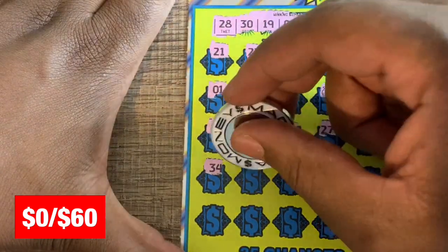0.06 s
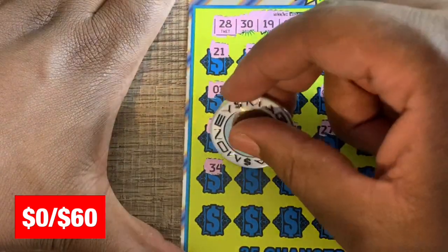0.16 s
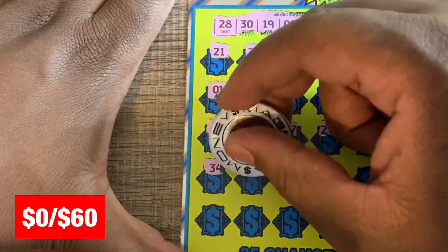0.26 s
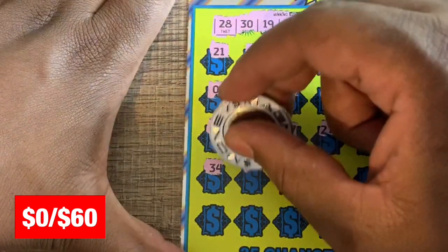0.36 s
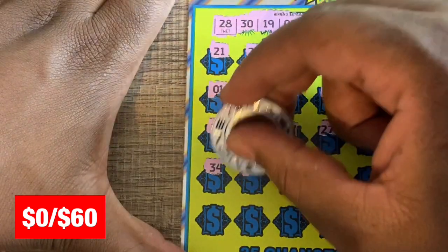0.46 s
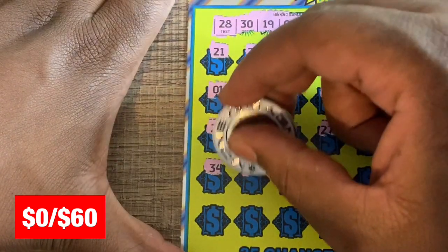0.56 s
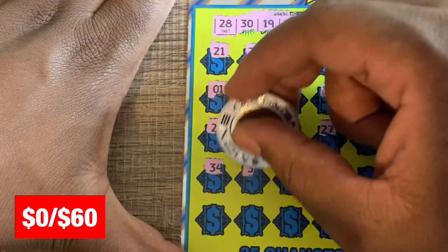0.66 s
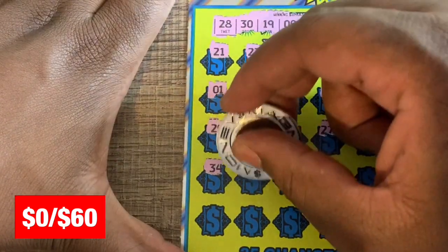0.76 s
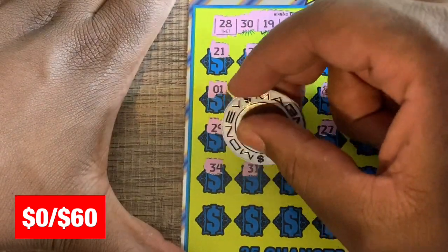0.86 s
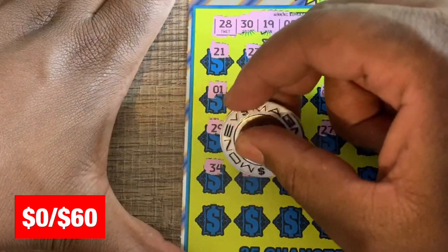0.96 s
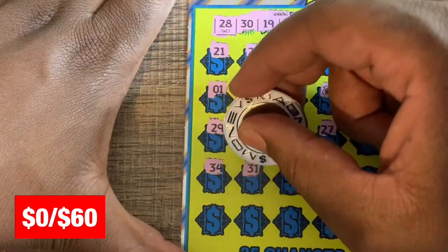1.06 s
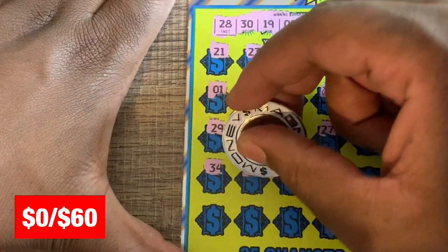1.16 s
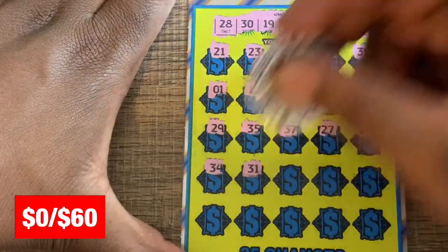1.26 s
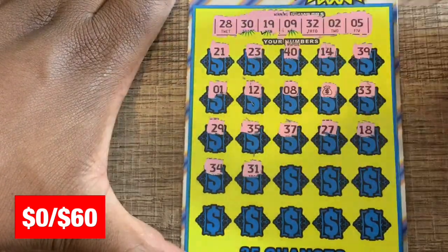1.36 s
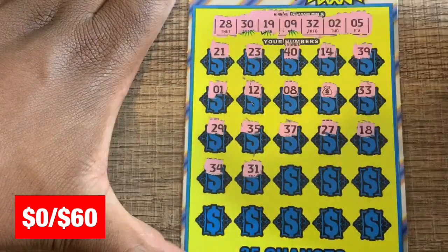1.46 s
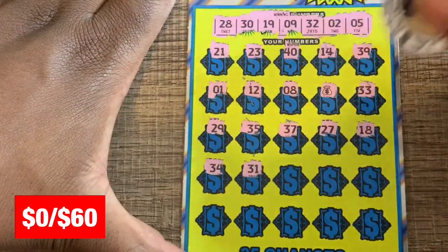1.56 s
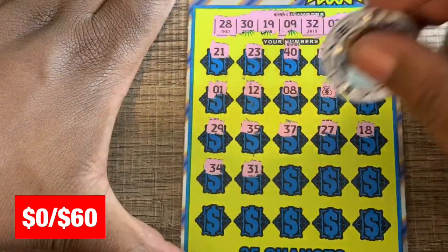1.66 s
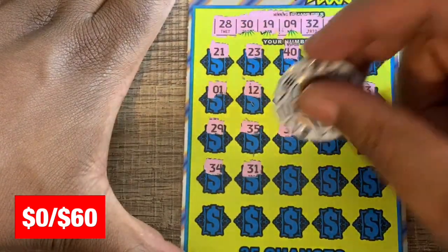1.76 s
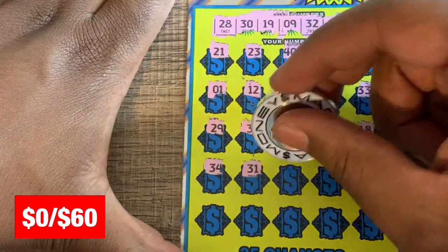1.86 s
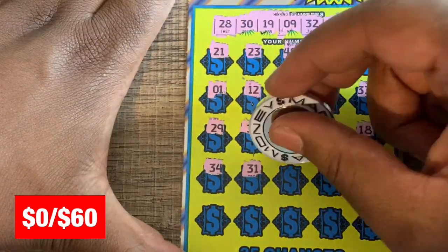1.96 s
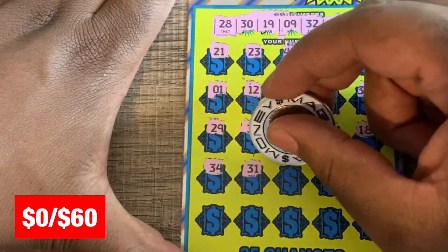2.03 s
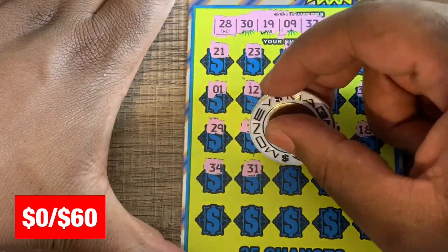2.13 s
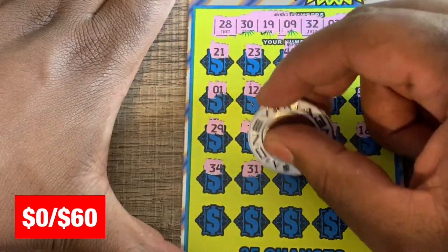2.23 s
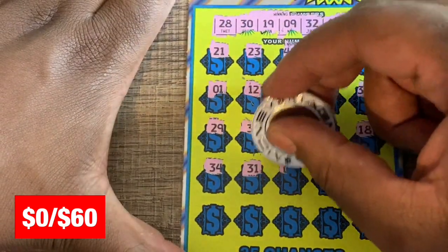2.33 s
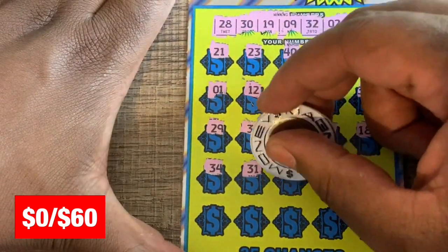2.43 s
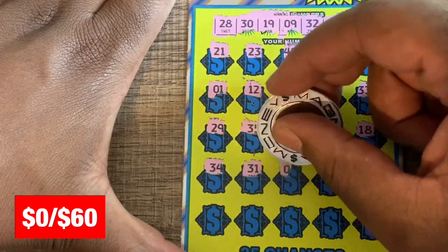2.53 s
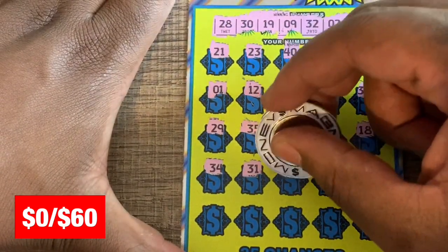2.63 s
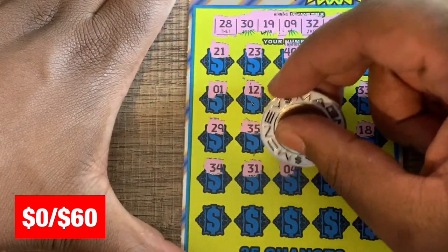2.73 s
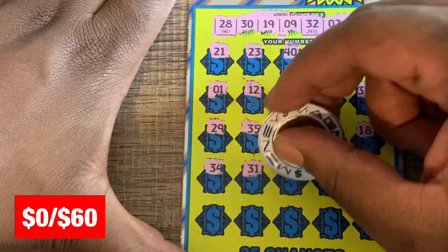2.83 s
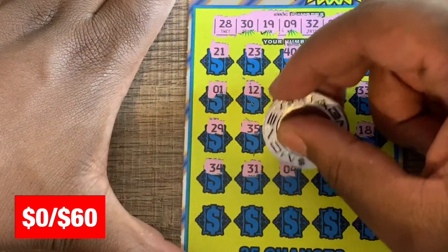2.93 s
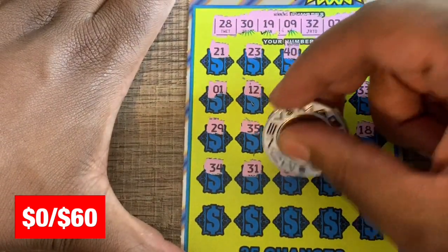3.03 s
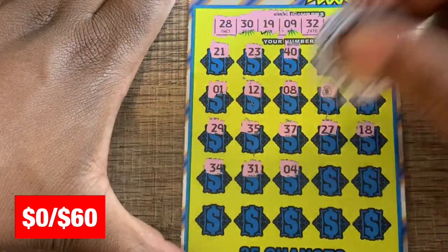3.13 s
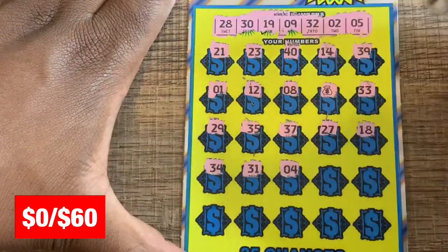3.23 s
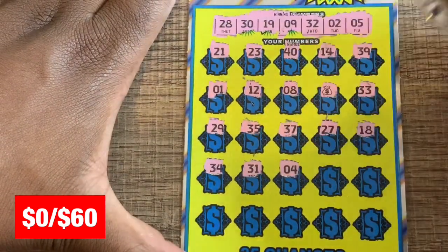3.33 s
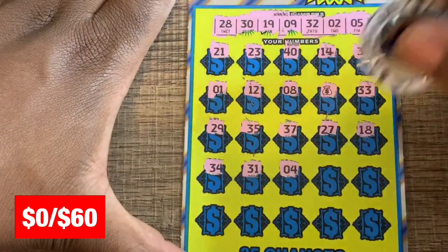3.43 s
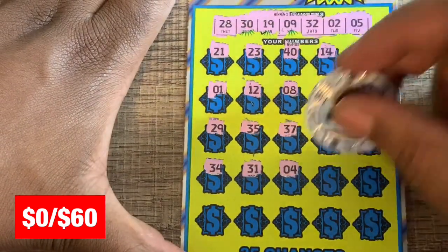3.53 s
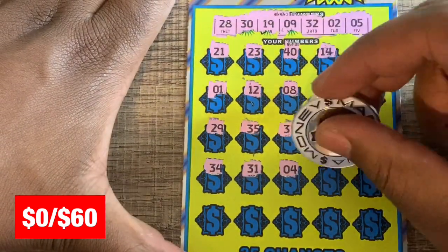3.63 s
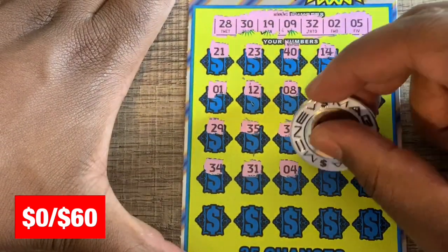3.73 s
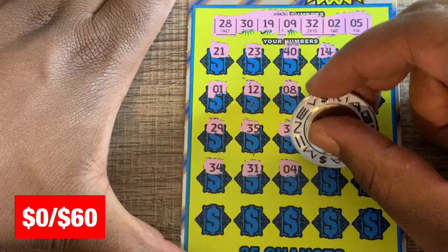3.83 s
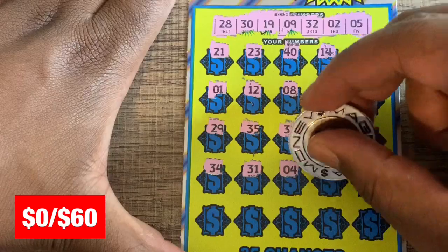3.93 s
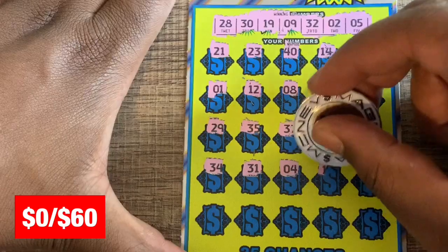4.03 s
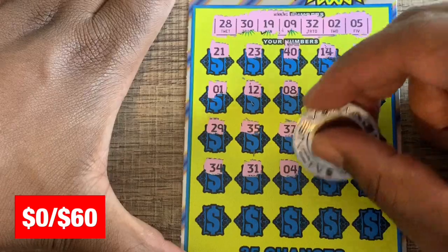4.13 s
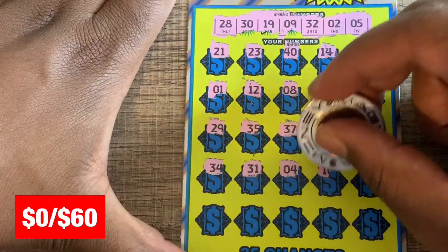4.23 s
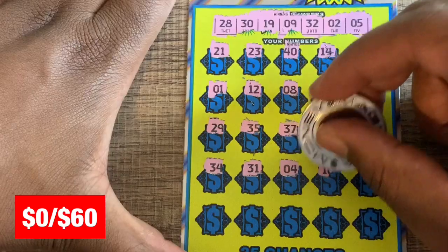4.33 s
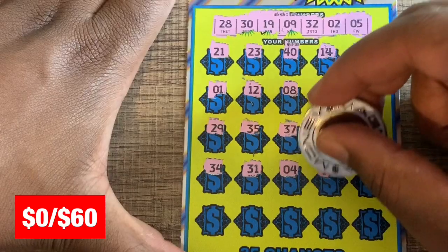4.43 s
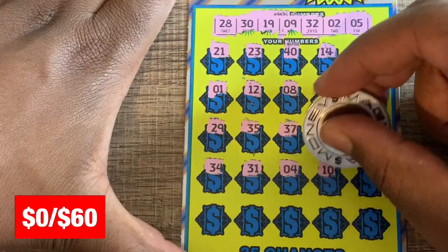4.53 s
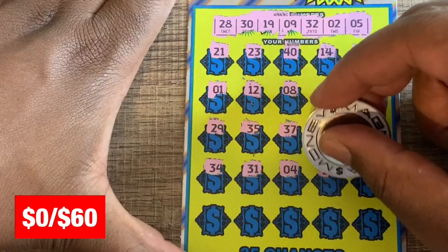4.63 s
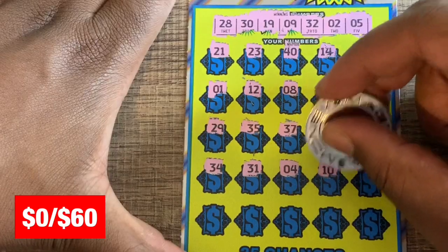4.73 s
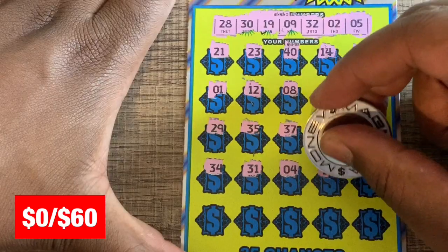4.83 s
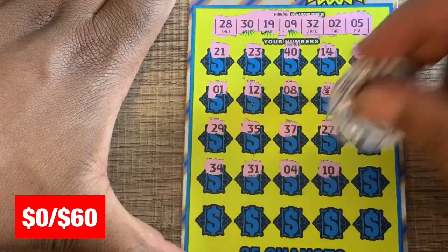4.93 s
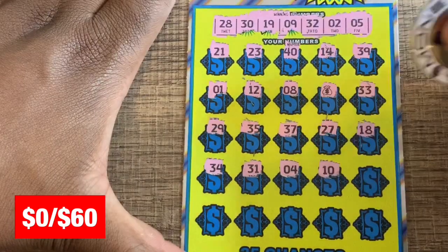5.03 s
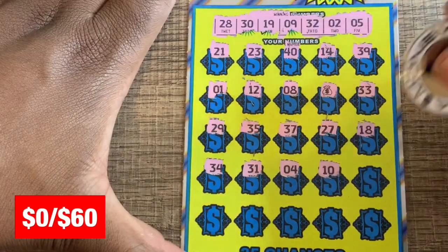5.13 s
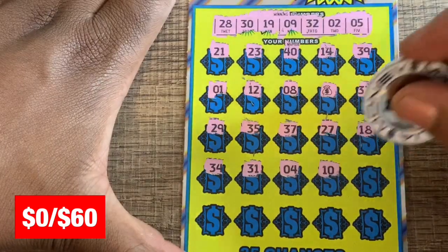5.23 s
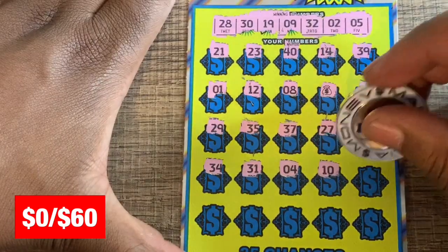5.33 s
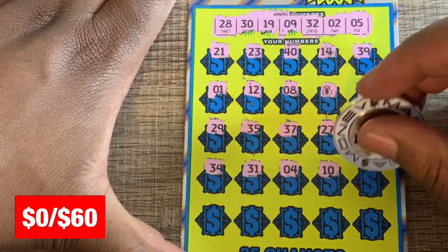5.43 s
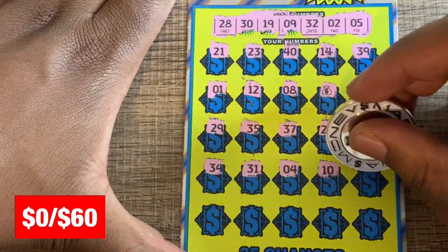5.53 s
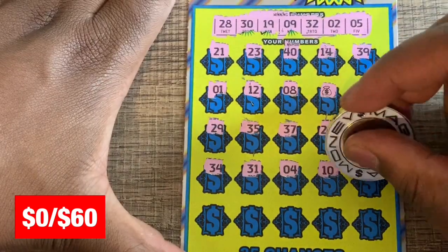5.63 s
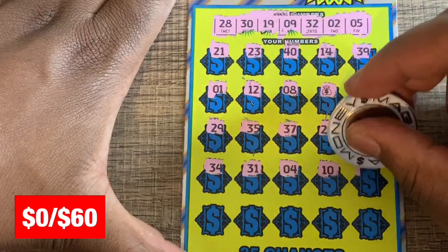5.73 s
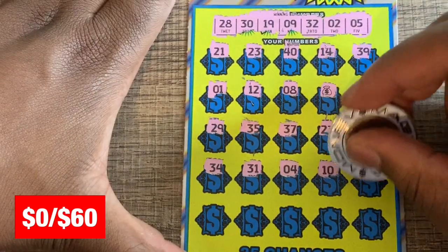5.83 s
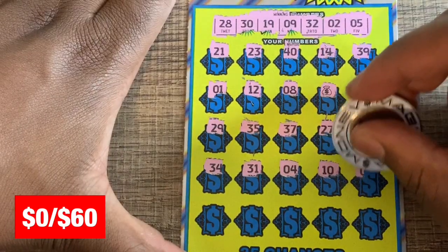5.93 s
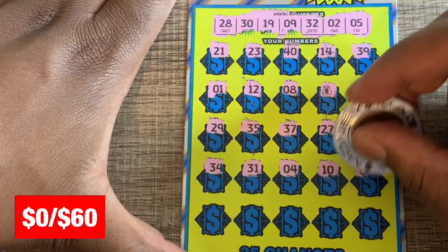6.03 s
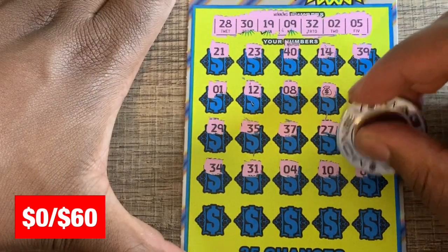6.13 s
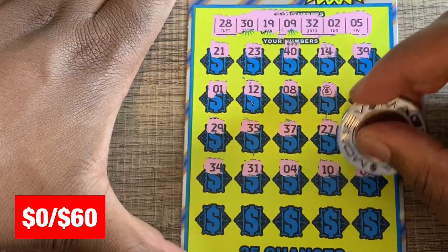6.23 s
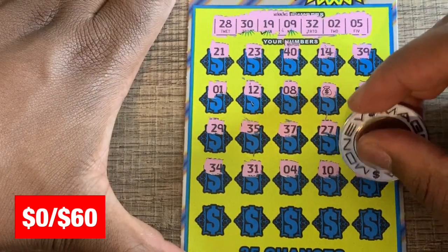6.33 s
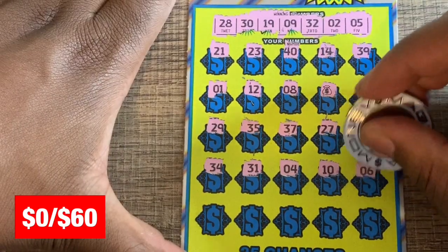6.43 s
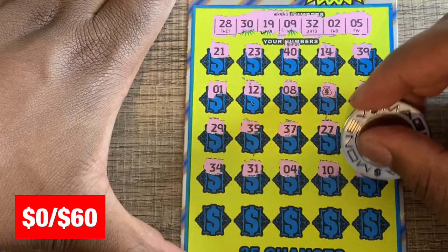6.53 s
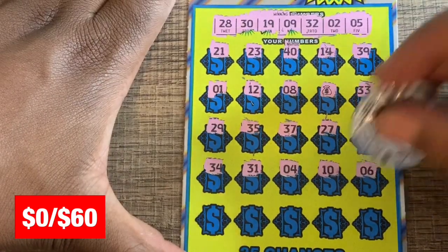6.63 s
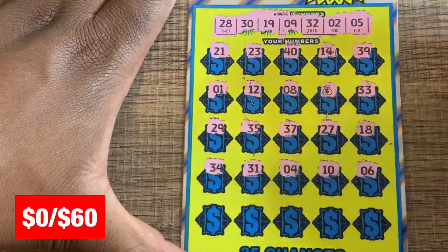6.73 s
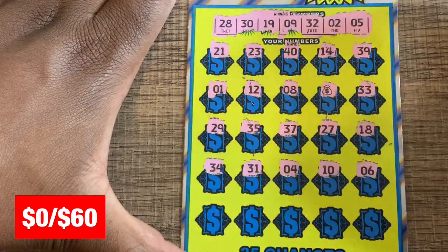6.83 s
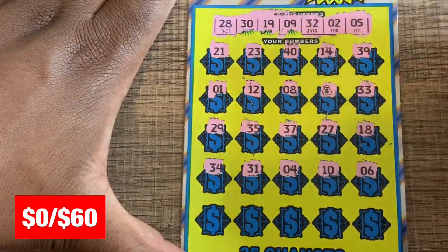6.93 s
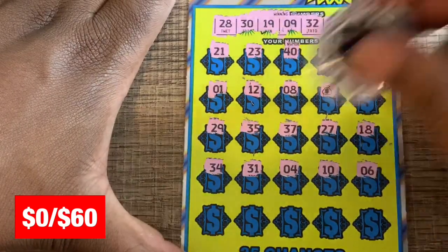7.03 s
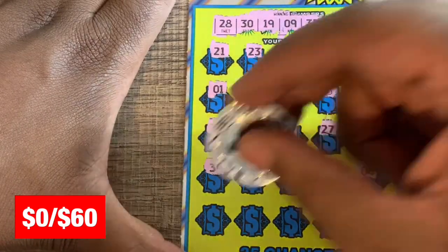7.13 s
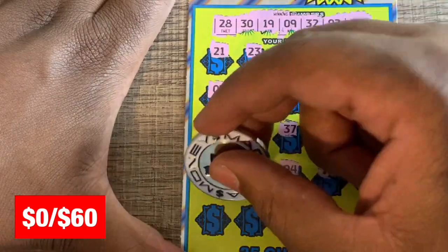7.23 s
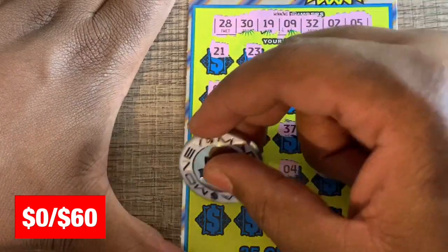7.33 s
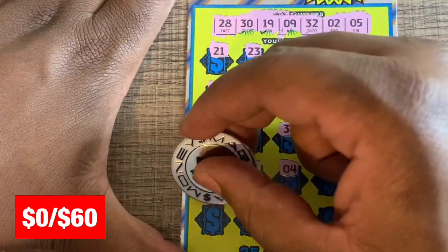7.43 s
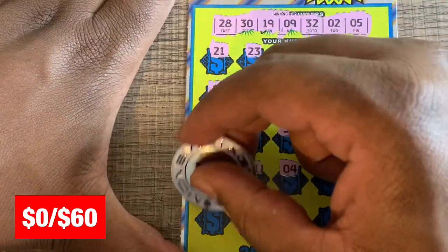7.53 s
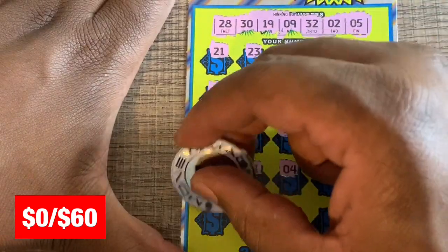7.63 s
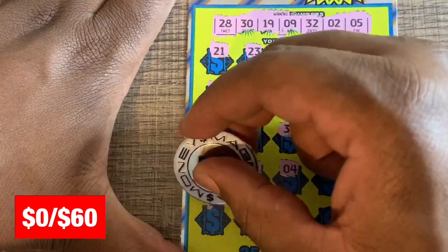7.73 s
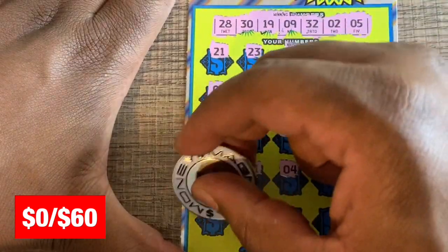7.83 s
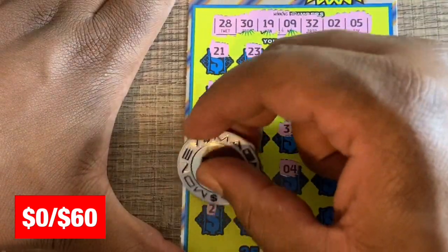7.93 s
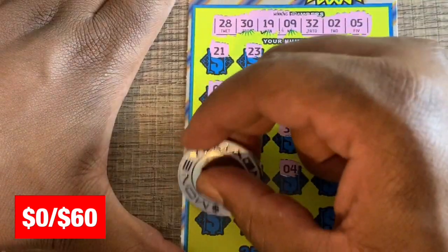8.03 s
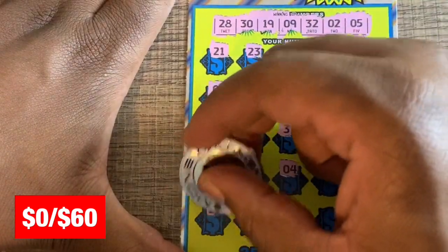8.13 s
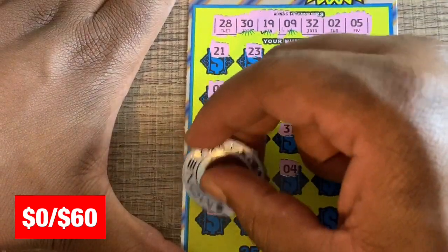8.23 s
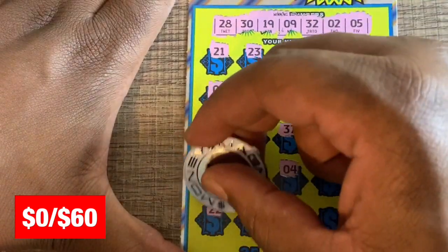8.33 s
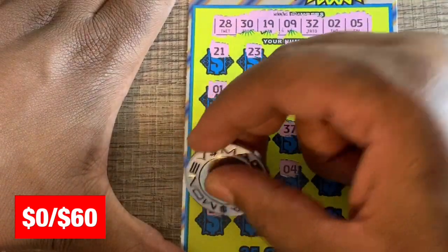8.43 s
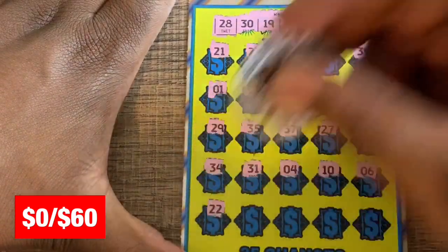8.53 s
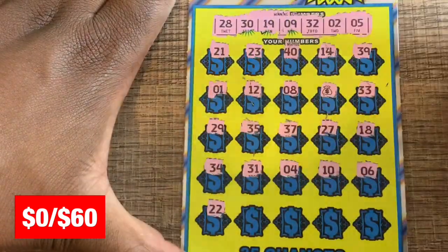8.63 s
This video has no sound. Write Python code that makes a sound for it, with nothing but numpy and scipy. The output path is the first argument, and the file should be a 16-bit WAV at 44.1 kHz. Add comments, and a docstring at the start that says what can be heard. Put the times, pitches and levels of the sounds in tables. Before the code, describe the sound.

In a quiet indoor room with faint hum, a hard chip lands on a card on a wooden table with a sharp knock, then scrapes rapidly back and forth, gritty and slightly ringing. The rim jolts the table with small thumps. Ticks and soft hand brushes follow, and the pattern repeats over five spots. Close stereo microphones.

```python
"""In a quiet, humming room a hand sets a round chip down on a scratch card on a wooden table: the table knocks.
Quick back-and-forth strokes scrape a spot clean: noise grit rasps, rings the chip and drives the table modes;
the rim catches and jolts the table. Then the rim ticks on the card, as short rough rings, and the hand brushes
away, as smooth noise. This happens at five spots in turn, each with its own grip. Two microphone ports are close."""
import sys
import numpy as np
from scipy import signal
from scipy.fft import rfft, irfft, next_fast_len
from scipy.io import wavfile
from scipy.ndimage import uniform_filter1d

SR = 44100
rng = np.random.default_rng(int(sys.argv[2]) if len(sys.argv) > 2 else 0)


def wav_out(sig):
    """Save sig, one row per channel (or a flat mono array), as 16-bit PCM at SR to the path in sys.argv[1]."""
    wavfile.write(sys.argv[1], SR, np.round(np.clip(np.atleast_2d(sig).T, -1, 1) * 32767).astype(np.int16))


N = 383229

# Scraping strokes: (middle [s], length scale [s], rasp [dB], shove of the arm [dB], squeak [dB]), relative levels
STROKES = [(.179, 0.051, -54.5, -68, -75), (0.252, 0.035, -53.5, -67, -53.5), (0.3, 0.075, -70, -75, -57.5),
           (0.348, 0.052, -56.5, -53, -66), (0.43, 0.05, -54.5, -46.5, -52),
           (0.522, 0.049, -55.5, -55, -63), (0.615, 0.047, -52, -53, -48.5),
           (0.698, 0.054, -53.5, -60, -77), (.79, 0.052, -54.5, -68, -58.5), (0.871, 0.062, -62, -61, -73),
           (0.922, 0.047, -79.5, -65, -56.5), (0.974, 0.04, -60.5, -55, -55), (1.061, 0.071, -66, -59, -69),
           (1.143, 0.012, -71, -64, -84), (2.175, 0.042, -51.5, -57.5, -68),
           (2.283, .057, -56.5, -58, -55.5), (2.364, 0.05, -51, -49, -72),
           (2.455, 0.052, -49.5, -54.5, -52), (2.536, 0.054, -55.5, -62, -65),
           (2.637, 0.046, -57, -79, -58), (2.717, 0.067, -57.5, -48.5, -66),
           (2.819, 0.046, -55, -56, -57.5), (2.916, 0.057, -60.5, -56, -67.5),
           (2.988, 0.015, -65.5, -48, -75), (3.774, 0.022, -57.5, -71, -51),
           (3.853, 0.061, -55.5, -48, -64), (3.941, .04, -50.5, -64, -56), (4.025, 0.058, -51.5, -51, -72),
           (4.118, 0.053, -54, -53, -59.5), (4.201, 0.063, -58, -69, -78), (4.298, 0.027, -58, -64, -56.5),
           (4.379, 0.051, -59, -53.5, -70), (4.481, 0.04, -57.5, -54, -61),
           (4.562, 0.078, -64.5, -56, -67.5), (4.688, 0.03, -56.5, -51, -53.5),
           (4.765, 0.061, -65, -51.5, -73), (5.568, 0.029, -55.5, -56, -62),
           (5.636, 0.036, -50.5, -62, -52), (5.725, 0.064, -55.5, -52, -63.5), (5.817, .039, -56, -51, -81),
           (5.91, 0.062, -59, -79, -63), (6.004, 0.045, -54, -54, -61), (6.09, 0.055, -55, -54, -60.5),
           (6.193, .042, -65, -62, -62.5), (6.264, 0.058, -60, -51, -65), (6.383, 0.042, -55.5, -62, -56),
           (6.464, 0.093, -83, -56.5, -72), (7.432, 0.039, -67, -49.5, -61), (7.5, .033, -51, -49.5, -52),
           (7.583, 0.064, -60, -56.5, -64), (7.667, 0.019, -69.5, -61, -68.5),
           (7.754, 0.044, -56, -53.5, -54), (7.837, 0.051, -50.5, -45, -60),
           (7.926, 0.046, -54.5, -54, -65), (8.018, 0.05, -59, -54, -59), (8.102, 0.059, -59.5, -51.5, -58),
           (8.201, 0.044, -51.5, -59, -55.5), (8.296, 0.05, -62.5, -63.5, -61.5)]
# Landings of the chip: (time [s], blow [dB], low thud over blow [dB], sharp crack over blow [dB]), relative levels
LANDINGS = [(0.095, -23, -14.5, -12.5), (1.936, -21.5, -13.5, -8), (3.636, -31, -6.5, -32),
            (5.502, -32.5, -12, -23), (7.322, -42.5, -2, -3.5)]
# Rim catches and jolts the table: (time [s], falling thump [dB], tap [dB]), relative levels
JOLTS = [(.244, -44, -61), (0.422, -53, -50), (.623, -46, -32), (.806, -39.5, -57), (.984, -38, -32.5),
         (1.14, -57, -39), (1.366, -56, -53), (1.727, -64, -68), (2.154, -40, -35), (2.893, -43, -47),
         (3.771, -54.5, -45.5), (3.948, -41.5, -28.5), (4.303, -38, -33), (4.489, -43, -32.5),
         (4.698, -42, -47), (4.887, -53, -47), (4.954, -54, -53), (5.633, -56.5, -37), (5.826, -42, -28.5),
         (6.008, -40, -31), (6.554, -60, -50), (7.42, -39, -47), (7.491, -56, -39), (7.682, -40, -43),
         (7.746, -39, -32.5), (8.006, -61, -56), (8.108, -41, -50), (8.181, -62, -44)]
# Rim touches or leaves the card: (time [s], relative level [dB], ring frequency [Hz])
TICKS = [(1.1433, -71, 2850), (1.2029, -35, 3720), (1.721, -64.5, 3800), (3.049, -36.5, 3820),
         (3.6305, -23.5, 4880), (4.8286, -39.5, 3700), (4.8866, -39, 3730), (4.9512, -43.5, 2820),
         (5.4808, -31.5, 4620), (6.561, -51, 3020), (6.612, -43, 3640), (7.3188, -47, 3000),
         (8.459, -35.5, 3200)]
# Fizz spectrum, the treble of the friction: (frequency [Hz], relative level [dB])
FIZZ = [(7500, -1), (9000, -7), (10500, -5), (12000, -4.5), (13500, 1.5), (14500, -21), (15500, -15.5)]
# Dull thud spectrum of card and table: (frequency [Hz], relative level [dB])
THUD = [(85, -21.5), (120, 3), (200, 1), (320, -3), (450, -10), (700, -22)]
# Decay of the close-set table modes: (frequency [Hz], t60 [s])
WOOD = [(150, 0.08), (500, 0.26), (1000, 0.037), (1600, 0.48), (4000, 0.16)]


def gain_of(db):
    """Decibels to gain."""
    return 10 ** (np.asarray(db) / 20)


def evened(x):
    """Scales to rms 1."""
    return x / np.sqrt(np.mean(x ** 2) + 1e-20)


def wandering(shape, window):
    """Smoothed noise at rms 1; window in samples."""
    return evened(uniform_filter1d(rng.standard_normal(shape), window))


def read(points, hz):
    """Reads a table on a log-frequency axis."""
    f, value = np.transpose(points)
    return np.interp(np.log(hz + 1), np.log(f + 1), value)


def colour(points):
    """Short causal (minimum-phase) response of energy 1 with the given spectrum, dark outside it."""
    hz = abs(np.fft.fftfreq(4096, 1 / SR))
    ends = [(points[0][0] / 2, -70)] + list(points) + [(points[-1][0] * 1.3, -70)]
    log_gain = np.log(gain_of(read(ends, hz)))
    taps = np.fft.ifft(np.exp(np.conj(signal.hilbert(log_gain)))).real[:2048]
    return taps / np.linalg.norm(taps)


def through(x, taps):
    """Convolves each channel with its response."""
    return signal.oaconvolve(np.atleast_2d(x), np.atleast_2d(taps), axes=1)[:, :N]


def tail(points, decays, count=2, size=16384):
    """Unrelated noise responses of energy 1: each band dies at its own speed, the broad spectrum follows the points."""
    hz, t, z = signal.stft(rng.standard_normal((count, size)), SR, nperseg=128)
    decay = gain_of(-60 * t / read(decays, hz)[:, None])
    dying = signal.istft(z * decay, SR, nperseg=128)[1][:, :size]
    spectrum = np.fft.fft(dying)
    # flatten the broad spectrum before colouring
    broad = uniform_filter1d(abs(spectrum) ** 2, round(250 * size / SR), mode="wrap")
    flatten = np.exp(np.conj(signal.hilbert(-.5 * np.log(broad))))
    even = np.fft.ifft(spectrum * flatten).real
    out = through(even, colour(points))[:, :size]
    return out / np.linalg.norm(out, axis=1, keepdims=True)


def blended(x, sets, turns_per_s):
    """Passes x through three pairs of responses that fade into one another."""
    turn = 2 * np.pi * turns_per_s * np.arange(N) / SR
    out = 0
    for k, taps in enumerate(sets):
        out = out + np.sqrt(2 / 3) * through(x * np.cos(turn + k * np.pi / 3), taps)
    return out


def ringing(x, hz, width_hz):
    """One steep resonance, two equal peak filters in a row driven by x, at rms 1."""
    shape = signal.iirpeak(hz, hz / width_hz, SR)
    return evened(signal.lfilter(*shape, signal.lfilter(*shape, x)))


def grit(per_s, spread_db):
    """Crumbs of coating tearing off: dense clicks of uneven size that come in clumps."""
    clumps = wandering(N, 120)
    size = gain_of(spread_db * np.minimum(rng.exponential(1, (2, N)), 4) + 1.82 * clumps)
    struck = rng.random(N) < per_s / SR
    return evened(size * rng.standard_normal((2, N)) * struck)


def push(levels_db, stretch, rise, late_s=0):
    """Level of all strokes: each swells and fades as a bell, with its rise scaled separately."""
    t, power = np.arange(N) / SR, np.zeros(N)
    for (s, length_s, *_), db in zip(STROKES, levels_db):
        a, b = round((s - .12) * SR), round((s + .25) * SR)
        u = (t[a:b] - s - late_s) / (stretch * length_s)
        power[a:b] += gain_of(2 * db) * np.exp(-abs(np.where(u < 0, u / rise, u)) ** 1.87)
    return np.sqrt(power)


def squealing(x):
    """The card's own note: a resonance driven by x, its pitch wandering slowly at random."""
    note_hz, wander_hz, pole_width_hz = 1560, 39, 76
    hz = note_hz + wander_hz * wandering(N, 9000)
    turn = np.exp(2j * np.pi * np.cumsum(hz) / SR)
    r = np.exp(-np.pi * pole_width_hz / SR)
    # shift the note to 0 Hz, filter, shift back
    return evened((turn * signal.lfilter([1], [1, -2 * r, r * r], x / turn)).real)


def room_tone():
    """Still air as coloured noise, and a mains hum of sines that waver in level."""
    # Hum partials: (frequency [Hz], mid level [dB])
    partials = [(59.2, -92), (118.4, -78), (387, -90)]
    # Air spectrum: (frequency [Hz], relative level [dB])
    air_spectrum = [(30, -6.5), (60, -15.5), (150, -7.5), (400, -17), (800, -23.5), (2000, -25.5),
                    (5000, -30), (10000, -35), (15500, -30.5)]
    air_db, waver_db = -75.5, 2.0
    t = np.arange(N) / SR
    waver = wandering((len(partials), N), 4000)
    hum = 0
    for (hz, db), w in zip(partials, waver):
        hum = hum + np.sqrt(2) * gain_of(db + waver_db * w) * np.sin(2 * np.pi * hz * t)
    return gain_of(air_db) * through(rng.standard_normal((2, N)), colour(air_spectrum)) + hum


def after_blows(t60_s):
    """Level that jumps at each landing and dies away exponentially."""
    t, power = np.arange(N) / SR, np.zeros(N)
    for s, db, *_ in LANDINGS:
        power += (t > s) * gain_of(2 * (db - 60 * np.maximum(t - s, 0) / t60_s))
    return np.sqrt(power)


def shaking():
    """The moving arm's weight on the table: low lumpy rumble and faint, dull table noise."""
    # Weight of the arm: (time [s], rumble [dB], table noise [dB]), relative levels
    arm = [(0, -69, -60), (.12, -62, -51.5), (1.06, -72, -56), (1.21, -60.5, -64), (1.6, -73, -78.5),
           (1.9, -70, -89), (2.15, -65, -55.5), (2.9, -65, -59), (3.07, -55, -63.5), (3.19, -68, -63),
           (3.39, -70, -63), (3.6, -73, -80.5), (3.8, -61, -51.5), (4.8, -65, -62), (4.91, -54, -73),
           (5.13, -78, -79.5), (5.458, -79, -82), (5.56, -58.5, -55), (6.46, -69, -59), (6.66, -58.5, -72),
           (6.73, -78, -77), (7.12, -71, -80.5), (7.28, -88, -79), (7.381, -62, -55.5), (8.3, -65, -57),
           (8.47, -73, -79), (8.69, -77, -70)]
    # Rumble spectrum: (frequency [Hz], relative level [dB])
    rumble_spectrum = [(25, -25), (40, -6.5), (55, 1.5), (75, -8.5), (110, -9.5), (150, -18.5)]
    dull_spectrum = [(100, 15.5), (600, -6.0), (1100, -4), (1700, 6.5), (2200, -22.5), (5000, -25.0)]  # (Hz, dB)
    sway_db, sway_late_s = -3.0, 0.036  # the table sways just after each shove
    settle_db, settle_t60_s = -22.5, 0.92  # after a landing the table keeps murmuring
    t, (s, rumble_db, creep_db) = np.arange(N) / SR, np.transpose(arm)

    rumble = through(rng.standard_normal((2, N)), colour(rumble_spectrum))
    rumble = rumble * gain_of(1.8 * wandering(N, 1200))
    shove_db = np.transpose(STROKES)[3]
    sway = gain_of(sway_db) * push(shove_db, stretch=0.52, rise=0.7, late_s=sway_late_s)
    sway = np.hypot(sway, gain_of(np.interp(t, s, rumble_db)))

    dull = through(rng.standard_normal(N), colour(dull_spectrum))
    murmur = gain_of(settle_db) * after_blows(settle_t60_s)
    creep = np.hypot(gain_of(np.interp(t, s, creep_db)), murmur)
    thuds = gain_of(-13.0) * creep * through(rng.standard_normal((2, N)), colour(THUD))
    return sway * rumble + thuds, gain_of(-18.0) * creep * dull[0]


def brushing():
    """Smooth, fine-grained friction of skin and sleeve on card and table; each brush rises, holds and falls."""
    # Brushes: (time [s], hold [s], relative level [dB], rise over 20 dB [s], fall over 20 dB [s])
    brushes = [(1.25, 0.0063, -56, 0.048, 0.088), (1.369, 0.044, -65, 0.07, .09),
               (1.557, 0.0083, -74.5, .15, 0.053), (1.732, 0.011, -80.5, 0.091, 0.095),
               (3.091, 0.0041, -59.5, 0.048, 0.068), (3.207, 0.0041, -64.5, .065, 0.19),
               (3.47, .005, -80, 0.16, 0.042), (4.892, 0.0043, -64.5, .004, 0.13),
               (4.949, 0.012, -59, 0.014, 0.13), (6.557, 0.0044, -74, .006, .04),
               (6.61, 0.059, -69, 0.012, 0.093), (6.698, 0.0092, -58, 0.095, 0.043),
               (6.9, .16, -66.5, 0.087, 0.082), (8.462, .005, -53, 0.023, 0.084),
               (8.61, 0.013, -59.5, 0.13, 0.27)]
    # Brush spectrum: (frequency [Hz], relative level [dB])
    brush_spectrum = [(700, -47.5), (1500, -0.5), (2200, 3), (3500, 10), (5000, 8), (7000, 3), (9000, -3)]
    note_db, treble_db = -11.5, -7
    t, power = np.arange(N) / SR, np.zeros(N)
    for s, hold_s, db, rise_s, fall_s in brushes:
        rise_db = 20 * np.maximum(s - t, 0) / rise_s
        fall_db = 20 * np.maximum(t - s - hold_s, 0) / fall_s
        power += gain_of(2 * (db - rise_db - fall_db))
    grains = grit(per_s=14000, spread_db=3.0)
    friction = through(grains, colour(brush_spectrum))
    friction = friction + gain_of(note_db) * squealing(grains)
    friction = friction + gain_of(treble_db) * through(grains, colour(FIZZ))
    return np.sqrt(power) * friction


def ticks():
    """Rim on card: a short, rough ring, sine plus driven resonance, on a wide noise click."""
    out, t = np.zeros((2, N)), np.arange(700) / SR
    snaps = rng.standard_normal((len(TICKS), 2, len(t)))
    decay_db = -60 * t / 0.012
    for (s, db, hz), snap in zip(TICKS, snaps):
        ring = 0.32 * np.sin(2 * np.pi * hz * t) + .5 * ringing(snap, hz, width_hz=1700)
        click = np.diff(snap, prepend=0) * gain_of(-9.5)
        tick = (ring + click) * gain_of(decay_db)
        out[:, round(s * SR):][:, :len(t)] += gain_of(db - 2.0) * tick * np.minimum(t / 0.00012, 1)
    return out


def jolts():
    """A bending wave crosses the table: its treble arrives first, so the thump falls in pitch."""
    cycles, start_s, rise_s, t60_s = 1.826, 0.00152, 0.005, 0.11  # pitch [Hz] = cycles / (time + start)
    landing_db = 4.5  # over the landing's thud
    force, t = np.zeros(N), np.arange(4096) / SR
    for s, db, _ in JOLTS:
        force[round(s * SR)] = gain_of(db)
    for s, db, thud_db, _ in LANDINGS:
        force[round(s * SR)] = gain_of(db + thud_db + landing_db)
    sweep = np.sin(2 * np.pi * cycles * np.log1p(t / start_s))
    return through(force, sweep * (1 - np.exp(-t / rise_s)) * gain_of(-60 * t / t60_s))


def knocks():
    """Landings with their bounces, rim taps and ticks as impulses: noise cracks, table force, low thumps."""
    # The chip rocks as it lands: (delay [s], level over the blow [dB])
    bounces = [(.002, 7), (.0059, -6)]
    crack_spectrum = [(2000, -1.5), (4000, -6.5), (8000, -11.5), (15000, -13.0)]  # (Hz, dB)
    thump_spectrum = [(100, -21.5), (150, -15.0), (240, -1.5), (350, 0.5), (600, -40.5)]  # (Hz, dB)
    tap_crack_db, tick_force_db, crack_t60_s = -36, -15, 0.011
    blow, low, sharp = np.zeros((3, N))
    for s, db, thud_db, crack_db in LANDINGS:
        for late_s, bounce_db in [(0, 0)] + bounces:
            at = round((s + late_s) * SR)
            blow[at] += gain_of(db + bounce_db)
            low[at] += gain_of(db + thud_db + bounce_db)
        sharp[round(s * SR)] += gain_of(db + crack_db)
    for s, _, db in JOLTS:
        blow[round(s * SR)] += gain_of(db)
        sharp[round(s * SR)] += gain_of(db + tap_crack_db)
    for s, db, _ in TICKS:
        blow[round(s * SR)] += gain_of(db + tick_force_db)  # a touch of the rim reaches the table too
    t = np.arange(900) / SR
    burst = rng.standard_normal((2, len(t))) * gain_of(-60 * t / crack_t60_s)
    crack = through(burst, colour(crack_spectrum))
    thump = gain_of(22.5) * through(low, tail(thump_spectrum, WOOD))
    return gain_of(-6.0) * through(sharp, crack), gain_of(11) * blow, thump


def table(force):
    """The table top answers a force with a first pulse, strong modes, and dense modes that drift with time."""
    # Strong modes: (frequency [Hz], relative level [dB], t60 [s])
    modes = [(218.7, -14.5, 0.15), (261.6, 1.5, 0.074), (321.6, -2.5, 0.13), (381, -12, 0.41),
             (499, -5.5, 0.033), (532.4, 0.5, 0.13), (620, -8, 0.034), (855, -3.5, 0.31), (996, 4.5, 0.056),
             (1120, 5, 0.04), (1194, -10.5, 0.11), (1457, -1.5, 0.045), (1380, -30.5, 0.092),
             (834, -11.5, 0.25)]
    # Close-set modes: (frequency [Hz], relative level [dB])
    dense_spectrum = [(150, -29), (300, -5), (550, 1), (1000, 1.5), (1600, -11), (1900, -17.5),
                      (2600, -19.5), (4000, -26), (6000, -42.5)]
    # First pulse of a blow: (frequency [Hz], relative level [dB])
    pulse_spectrum = [(150, -21), (300, 5), (700, -14.5), (1300, 5.5), (2000, -22.5), (4000, -13.5)]
    hz, db, t60_s = np.transpose(modes)[:, :, None]
    t = np.arange(16384) / SR
    phase = np.pi / 2 * (-1) ** np.arange(len(modes))[:, None]
    level = gain_of(db - 60 * t / t60_s)
    # the modes reach the ports a quarter turn apart
    rings = np.array([(level * np.sin(2 * np.pi * hz * t + side * phase)).sum(0) for side in (1, 0)])
    out = rings / np.linalg.norm(rings[0])
    pulse = colour(pulse_spectrum)
    out[0, 14:2062] += gain_of(-9.0) * pulse  # the pulse comes slightly later on the left
    out[1, :2048] += gain_of(-8) * pulse
    dense = tail(dense_spectrum, WOOD, count=6).reshape(3, 2, -1)
    return through(force, out) + gain_of(1.0) * blended(force, dense, turns_per_s=0.7087)


def under_hand(x):
    """The cupped hand keeps moving, so its reflections, short noise tails, keep changing."""
    # Reflections off hand, card and table: (frequency [Hz], t60 [s])
    nearby = [(1000, 0.0042), (4000, 0.043), (8000, 0.00233)]
    tails = tail([(800, 0.019), (15000, 0)], nearby, count=6, size=2048)
    return blended(x, tails.reshape(3, 2, -1), turns_per_s=1.3)


def scraping():
    """Grit sounds in the air, rings the chip as the grip allows, and drives card and table."""
    # Grip at each spot damps the chip differently: (start [s], relative level of each chip mode in turn [dB])
    grips = [(0, 0.5, -5, -14, 2, -14, -24, -3), (1.9, 0.5, -3, -8, 0.5, 3, -4.5, -2.5),
             (3.6, -1.5, -1, -8, 2.5, -22, -17, -1), (5.4, 3, 0, -19, -1, 9, -34, -6),
             (7.25, 3, -8, -17, 1, -0.5, -8.5, 0.5)]
    # Chip modes: (frequency [Hz], width of each filter pass [Hz])
    chip = [(2250, 260), (2730, 240), (3040, 260), (3650, 420), (6050, 1100), (6900, 600), (8300, 600)]
    # Rasp spectrum: (frequency [Hz], relative level [dB])
    rasp_spectrum = [(1200, 1), (2000, -9.5), (3000, 2.5), (4300, -5.5), (5200, -8.5), (6200, -4.5),
                     (7500, -20.5), (9000, -26.5), (10500, -77)]
    # Fizz at each spot in turn: (relative level [dB])
    fizz_by_spot_db = [4.5, 4.5, 4, 2, 0.5]
    usual_rasp_db, fingers_db = -56, 4  # fingers: how far the grip wanders
    _, _, rasp_db, shove_db, squeak_db = np.transpose(STROKES)
    ring_db = -48.5 + 0.29 * (rasp_db - usual_rasp_db)  # the table follows the rasp only a little
    fizz_db = -71.5 + 1.3 * (rasp_db - usual_rasp_db)  # the fizz grows faster than the rasp

    crumbs = grit(per_s=15000, spread_db=0.0)
    rasp = through(crumbs[0], colour(rasp_spectrum))
    spot = np.searchsorted([g[0] for g in grips], np.arange(N) / SR, "right") - 1
    fingers = wandering((len(chip), N), 3000)  # each mode's level wanders at random
    for k, (hz, width_hz) in enumerate(chip):
        mode_db = np.array(grips)[spot, k + 1] - 12.0 + fingers_db * fingers[k]
        rasp = rasp + gain_of(mode_db) * ringing(crumbs[0], hz, width_hz)
    rasp = under_hand(push(rasp_db, stretch=0.3, rise=0.98) * rasp[0])
    fizz_level = gain_of(fizz_by_spot_db)[spot] * push(fizz_db, stretch=0.24, rise=1.0)
    air = rasp + fizz_level * through(crumbs, colour(FIZZ))

    drive = grit(per_s=3400, spread_db=2.0)
    board = gain_of(-6.5) * push(ring_db, stretch=0.3, rise=0.98) * drive[0]
    squeak_level = gain_of(5.5) * push(squeak_db, stretch=0.3, rise=1.34, late_s=0.011)
    squeak = squeak_level * squealing(drive)
    shove = push(shove_db, stretch=0.41, rise=0.28) * rng.standard_normal((2, N))
    return air, board, squeak + through(shove, colour(THUD))


def scene():
    """Airborne sounds get the echo of the room; scrapes, blows and creep ring the table."""
    # Room decay: (frequency [Hz], t60 [s])
    room = [(150, 0.034), (1000, 0.057), (3000, 0.42), (8000, 0.31), (15000, 0.075)]
    rasp, scrape_force, card = scraping()
    crack, blow_force, thump = knocks()
    rumble, creep_force = shaking()
    air = rasp + crack + ticks() + brushing()
    echo = gain_of(-4.5) * through(air.mean(0), tail([(1000, 9.5), (4000, -7.5), (15000, -9)], room))
    board = table(scrape_force + blow_force + creep_force)
    return air + echo + board + card + thump + jolts() + rumble + room_tone()


def record(dry):
    """Both ports share the bass, and the treble with a delay; then the band limit."""
    # Bass heard alike by both ports: (frequency [Hz], share [0-1])
    bass_shared = [(60, 0.92), (130, 0.82), (280, 0.95), (500, 0.66), (1000, 0.095), (1500, 0.084)]
    # Treble heard alike but late on the left: (frequency [Hz], share [0-1])
    treble_shared = [(4000, 0.0095), (5500, 0.68), (7000, 0.07), (8500, 0.57), (10000, .93), (15000, 1)]
    # Left port louder by: (frequency [Hz], level [dB])
    left_over = [(60, .6), (250, .3), (600, 2), (1200, 1.4), (2200, .6), (4500, -2.2), (8000, .3),
                 (14000, .2)]
    left_delay_s, low_edge_hz, high_edge_hz = 0.0002947, 44, 15800
    size = next_fast_len(N + 4096)
    hz, (left, right) = np.fft.rfftfreq(size, 1 / SR), rfft(dry, size)
    bass = np.clip(read(bass_shared, hz), 0, 1)
    treble = np.clip(read(treble_shared, hz), 0, 1)
    late = np.exp(-2j * np.pi * hz * left_delay_s)
    own = np.sqrt(np.clip(1 - (bass + treble) ** 2, 0, 1))
    left = (bass + treble * late) * right + own * left
    ports = irfft(np.array([gain_of(read(left_over, hz)) * left, right]), size)[:, :N]
    # small ports pass no deep bass
    ports = signal.sosfilt(signal.butter(4, low_edge_hz, "high", fs=SR, output="sos"), ports)
    lowpass = signal.firwin(511, high_edge_hz, window=("kaiser", 9), fs=SR)
    return signal.oaconvolve(ports, lowpass[None], "same")


dry = scene()
out = record(dry)
wav_out(out)
```